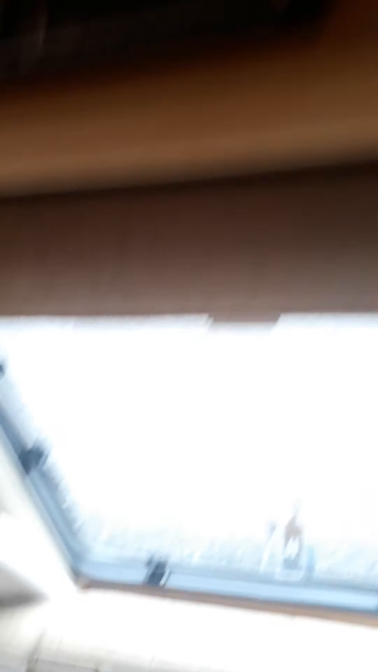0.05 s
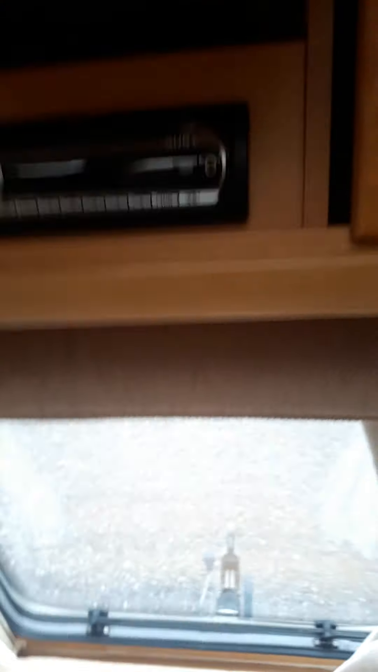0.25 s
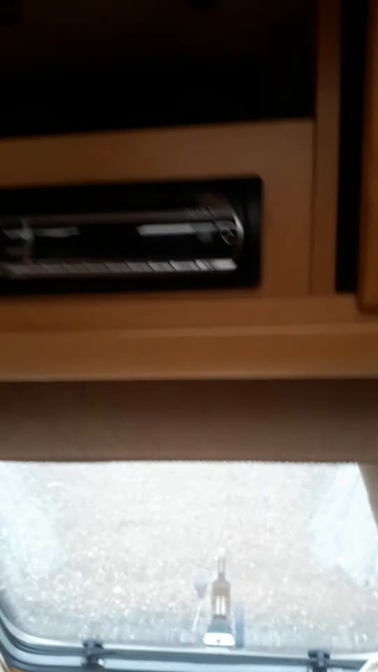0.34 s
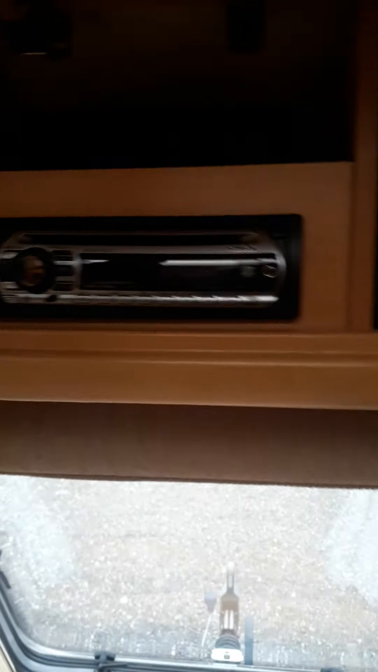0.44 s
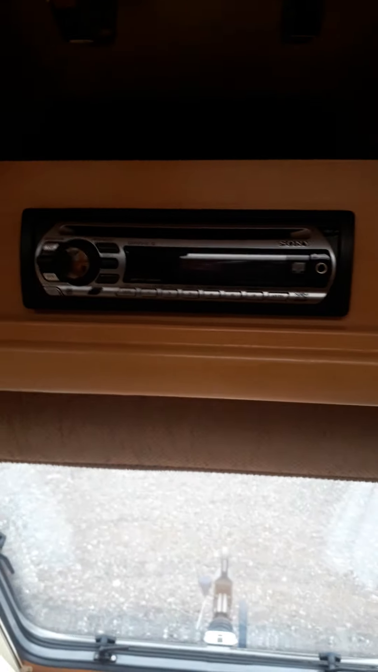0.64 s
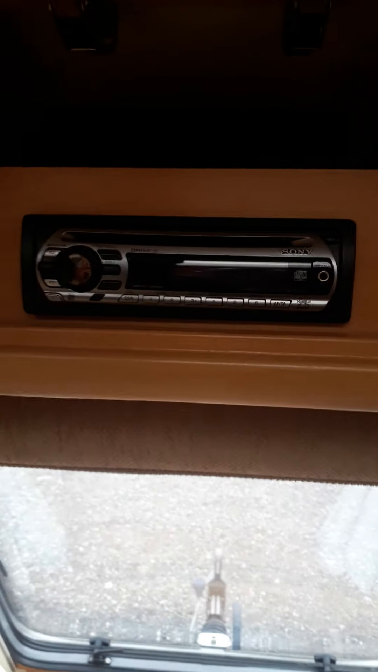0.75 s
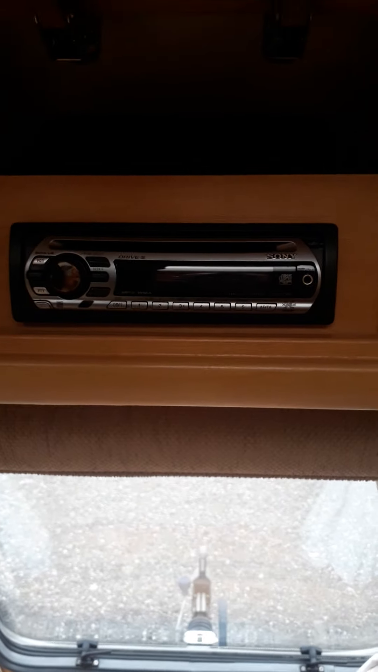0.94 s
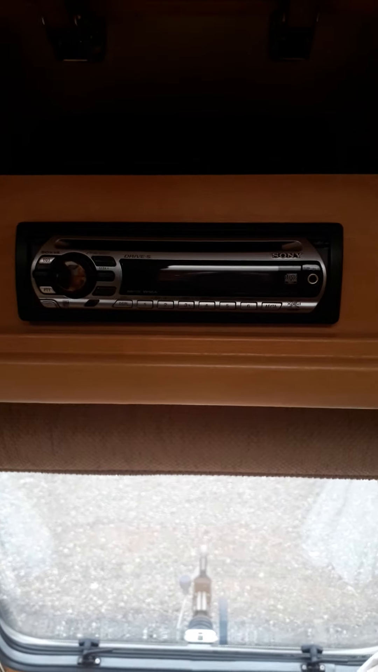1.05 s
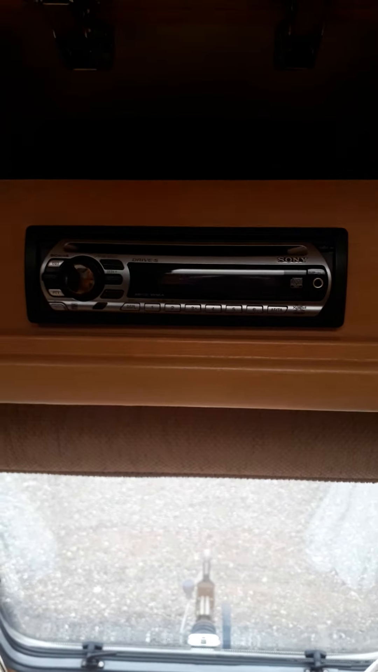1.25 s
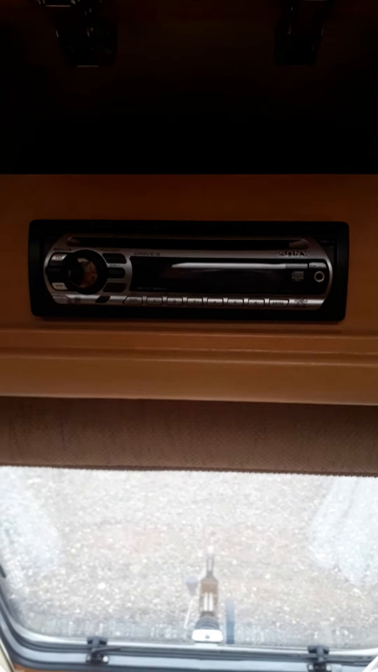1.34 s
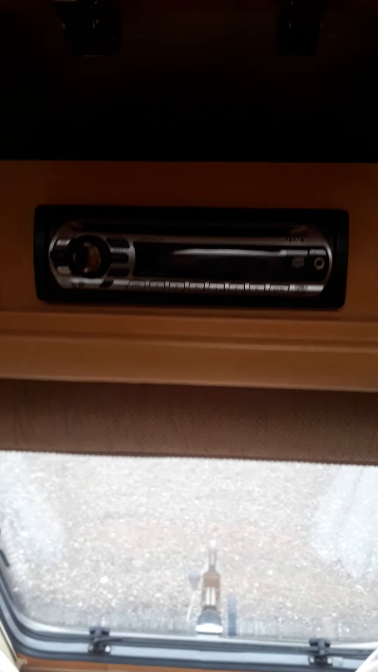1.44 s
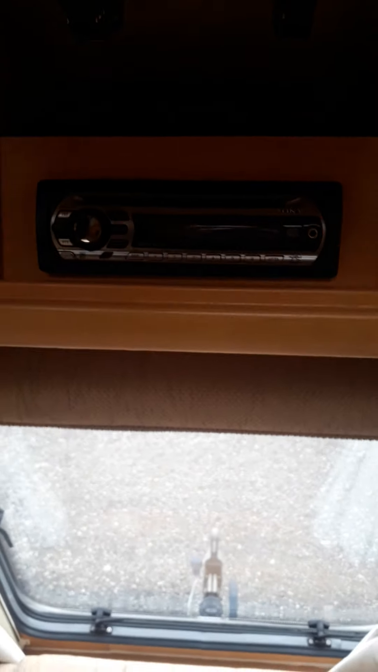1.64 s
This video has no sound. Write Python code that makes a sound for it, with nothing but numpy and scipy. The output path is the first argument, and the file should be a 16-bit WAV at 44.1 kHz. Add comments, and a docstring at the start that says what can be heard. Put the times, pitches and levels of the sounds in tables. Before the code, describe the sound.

A small wooden overhead locker door is pushed shut with a thump and sharp catch snap.

```python
"""First a low hum with faint bumps and ticks, then a caravan's overhead locker is pushed shut close by.
The catch scrapes over its striker, the wooden door thumps on the cabinet and the catch snaps home.
Fittings rattle, the small cabin rings briefly, then faint bumps, ticks and rustles follow.
Hard parts ring as fading sine waves or short noise bursts; rustles, air and hiss are filtered noise."""
import sys
import numpy as np
from scipy import signal
from scipy.fft import rfft, irfft
from scipy.io import wavfile
from scipy.ndimage import uniform_filter1d

SR = 44100
rng = np.random.default_rng(int(sys.argv[2]) if len(sys.argv) > 2 else 0)


def to_wav(s):
    """Save 16-bit WAV."""
    ch = np.atleast_2d(s).T  # columns
    pcm = np.round(np.clip(ch, -1, 1) * 32767)  # PCM
    wavfile.write(sys.argv[1], SR, pcm.astype(np.int16))


N = 74970
t = np.arange(N) / SR
RING = t[:16384]  # time axis of one short sound, about 0.37 s
# In all tables and settings, t60 is the time in seconds for a sound to fall by 60 dB.

# Ways the door and cabinet vibrate. Each row: pitch in Hz, level in dB, t60 in s, lean to the left in dB.
DOOR_MODES = [(92.6, -18.5, 0.43, 6), (122.7, -1, 0.14, 4.5), (170, -1.8, .13, 4), (207.7, -5.5, 0.16, 2.5),
              (340.4, -15, 0.21, 6.5), (385.4, -4, 0.073, 3.5), (568.4, 0, 0.049, 6.5), (668, -7, 0.097, 5),
              (756, -11, 0.11, 7), (905.4, -13.5, 0.12, -3), (1197, -15, 0.099, 2), (1320, -14.5, .11, 0.5)]
# Tone of the dense ring of the wooden panels. Each row: frequency in Hz, gain in dB.
PANEL_COLOUR = [(60, -26), (120, -6.5), (250, -2), (600, -4.5), (1000, -9), (1350, -1.5), (2500, -7),
                (6000, -9), (16000, -43)]
# The door meets the frame and chatters. Each row: start in s, level in dB, contact time in ms.
BLOWS = [(0.209, -38.5, 0.74), (0.2195, -23.5, 0.79), (0.2249, -16.5, 2.98), (0.2462, -26, 3.2),
         (0.2805, -26.5, 4.7), (.2940, -37, 0.45), (0.3427, -34.5, 3.3), (.3515, -45, .6),
         (0.3849, -29.5, 18)]


def door():
    """Each blow sets the door and cabinet vibrating; a longer contact is duller."""
    panels_db, panels_t60_s = -4.5, 0.063
    rise_s, cut_hz = 0.00034, 98
    body = amp(panels_db) * burst(PANEL_COLOUR, panels_t60_s)
    for hz, db, t60, pan_db in DOOR_MODES:
        body += amp(db) * pan(pan_db) * np.cos(2 * np.pi * hz * RING) * fade(t60)
    # the blow takes a moment to spread over the door
    body = body * (1 - np.exp(-RING / rise_s))
    # a small door radiates little bass
    body = shape(body, lambda f: 1 / np.hypot(1, (cut_hz / f) ** 2))
    out = np.zeros((2, N))
    for s, db, contact_ms in BLOWS:
        corner_hz = 1000 / contact_ms
        add(out, s, amp(db) * shape(body, lambda f: 1 / (1 + (f / corner_hz) ** 2)))
    return out


# The catch snaps home and bounces. Each row: start in s, level in dB against the settings below.
SNAPS = [(.2928, -1.5), (0.2950, -13.5), (0.2995, -12.5), (0.3022, -16.5)]
# Tone of the sharp crack of each contact. Each row: frequency in Hz, gain in dB.
CRACK_COLOUR = [(200, -15), (1500, -5.5), (2200, -3.5), (2750, 4), (3600, -1), (4600, -0.5), (6300, 7),
                (8000, 0.5), (12000, -1), (16000, -9)]
# Tone of the plastic housing. Each row: frequency in Hz, gain in dB.
HOUSING_COLOUR = [(150, 1.5), (560, 6), (900, -7), (1650, -2), (2650, 0), (3500, 0), (4300, -9),
                  (6000, -17.5), (8000, -10.5), (11000, -14), (16000, -31)]


def snaps():
    """Each contact of the catch gives a very short crack and a longer ring of its plastic housing."""
    crack_db, crack_t60_s = -18, 0.0055
    housing_db, housing_t60_s = -28, 0.034
    out = np.zeros((2, N))
    for s, db in SNAPS:
        crack = amp(db + crack_db) * burst(CRACK_COLOUR, crack_t60_s)
        housing = amp(db + housing_db) * burst(HOUSING_COLOUR, housing_t60_s)
        add(out, s, crack + housing)
    return out


# Ways the catch and its mounting vibrate.
# Each row: pitch in Hz, level in dB, t60 in s, lean to the left in dB.
CATCH_MODES = [(563, -34, 0.066, 6), (1265, -42, 0.059, 9), (1660, -37, 0.056, 3.5), (2020, -42, 0.083, -2),
               (2435, -36.5, 0.037, 1), (2744, -29, 0.021, 0), (3194, -38, 0.046, 4),
               (3568, -37.5, 0.034, -7)]


def catch_ring():
    """The first snap makes the catch and its mounting ring at their own pitches."""
    out = np.zeros((2, N))
    first_snap_s = SNAPS[0][0]
    for k, (hz, db, t60, pan_db) in enumerate(CATCH_MODES):
        sign = (-1) ** k  # every other mode starts the opposite way
        add(out, first_snap_s, sign * amp(db) * pan(pan_db) * mode(hz, t60))
    return out


# Small jumps of the catch over its striker.
# Each row: start in s, level in dB, treble tilt in dB per octave above 500 Hz, t60 in s.
SCRAPES = [(.2043, -37.5, 3.5, 0.019), (.2099, -28.5, 3.5, 0.015), (.2124, -30.5, 1.5, 0.01),
           (.2175, -29.5, -4, 0.022), (.2210, -27, 0.5, 0.016), (.2275, -28.5, -6, 0.027),
           (0.2360, -38, 0, 0.016), (.2420, -37.5, 0.7, .028), (0.2686, -44.5, 1.3, 0.033)]
# Tone of the scraping catch, for jumps and crunch. Each row: frequency in Hz, gain in dB.
SCRAPE_COLOUR = [(100, -25.5), (400, 12), (900, 3.5), (1400, 2.5), (1750, 0.5), (2100, 8.5), (2700, -2),
                 (4400, -6), (5500, -4.5), (7300, -3), (10000, -9.5), (16000, -17)]


def scrapes():
    """The catch rides over its striker in small jumps, each a short burst of noise."""
    out = np.zeros((2, N))
    for s, db, tilt_db, t60 in SCRAPES:
        add(out, s, amp(db) * burst(SCRAPE_COLOUR, t60, tilt_db))
    return out


def crunch():
    """Gritty friction of the catch between the jumps: rough noise that swells and dies away."""
    peak_s, rise_s, fall_s = 0.2188, 0.0067, 0.017
    level_db, roughness = -37, 0.45
    pressure = np.exp(np.minimum((t - peak_s) / rise_s, (peak_s - t) / fall_s))
    # smoothed noise makes the loudness flicker
    grit = uniform_filter1d(rng.standard_normal(N), size=40)
    grit = np.exp(roughness * grit / grit.std() - roughness ** 2)
    return amp(level_db) * tint(noise(N) * grit * pressure, SCRAPE_COLOUR)


# Short pinging knocks: the catch first touching its striker, loose fittings, and late clicks at the catches.
# Each row: start in s, level in dB against the settings below, lean to the left in dB, ring pitch in Hz.
KNOCKS = [(0.0143, -57, -6.5, 2350), (.2020, -38.5, 7, 2120), (0.2076, -34.5, 8, 2070),
          (0.315, -38, -7, 2220), (0.3499, -39, 5.5, 2100), (0.3533, -44, -5, 1770), (0.357, -46, -2, 2370),
          (0.3992, -45, -4.5, 2230), (0.4988, -61.5, 0, 2550), (1.4002, -65, 6, 2700),
          (1.4470, -61, -4, 2550), (1.4546, -62, 7, 2170)]
# Tone of the noisy part of a knock. Each row: frequency in Hz, gain in dB.
KNOCK_COLOUR = [(200, 5), (600, -1), (1000, -7), (1500, -2.5), (2350, -3.5), (3200, -13), (5000, -17),
                (16000, -44)]


def knocks():
    """Each small knock of catch or fittings is a noisy clack with a short ring at one pitch."""
    clack_db, clack_t60_s = -5.5, 0.024
    ring_db, ring_t60_s = -2.5, 0.012
    out = np.zeros((2, N))
    for s, db, pan_db, hz in KNOCKS:
        clack = amp(clack_db) * burst(KNOCK_COLOUR, clack_t60_s)
        ring = amp(ring_db) * mode(hz, ring_t60_s)
        add(out, s, amp(db) * pan(pan_db) * (clack + ring))
    return out


# Light ticks of fingers on the catches.
# Each row: start in s, level in dB, treble tilt in dB per octave above 500 Hz, t60 in s.
TICKS = [(0.0962, -52, 2.5, 0.026), (0.4996, -56, 5, 0.011), (.5580, -51.5, 7.5, 0.01),
         (1.4461, -55.5, 0, 0.016), (1.4510, -65, -0.5, 0.067)]
# Tone of a tick. Each row: frequency in Hz, gain in dB.
TICK_COLOUR = [(300, -13), (1400, -14), (2300, 3), (3400, -5.5), (4600, 4), (5800, -4.5), (7400, -0.5),
               (10000, -7), (16000, -7)]


def ticks():
    """Fingers tap the catches lightly: each tick is a short burst of noise."""
    out = np.zeros((2, N))
    for s, db, tilt_db, t60 in TICKS:
        add(out, s, amp(db) * burst(TICK_COLOUR, t60, tilt_db))
    return out


# Answer of the cabin to each pitch. Each row: frequency in Hz, gain in dB.
CABIN_COLOUR = [(50, -25), (130, -4), (400, -6.5), (1000, -5.5), (2500, -6), (6000, -11), (16000, -9.5)]


def cabin(x):
    """Near cupboard fronts answer at once; the furnished cabin adds a short tail."""
    tail_db, low_t60_s, high_t60_s, tail_rise_s = -6, 0.39, 0.37, 0.0019
    early_db, early_t60_s, early_rise_s = -7.5, 0.063, 0.0013
    # bass and treble of the tail meet at 2000 Hz and fade separately
    low = shape(noise(len(RING)) * fade(low_t60_s), lambda f: 1 / np.hypot(1, f / 2000))
    high = shape(noise(len(RING)) * fade(high_t60_s), lambda f: 1 / np.hypot(1, 2000 / f))
    tail = (low + high) * (1 - np.exp(-RING / tail_rise_s))
    tail = shape(unit(tail), lambda f: colour(CABIN_COLOUR, f))
    early = noise(len(RING)) * fade(early_t60_s) * (1 - np.exp(-RING / early_rise_s))
    # the near fronts send back little below 500 Hz
    early = shape(unit(even(early)), lambda f: 1 / np.hypot(1, (500 / f) ** 2))
    echoes = amp(tail_db) * tail + amp(early_db) * early
    return signal.fftconvolve(x, echoes, axes=1)[:, :N]


# Soft bumps on the furniture. Each row: start in s, level in dB, pitch in Hz, t60 in s.
BUMPS = [(0.044, -52.5, 103, 0.13), (0.104, -53, 197, 0.12), (.3280, -40, 272.3, 0.16),
         (.3740, -34, 116, 0.054), (0.451, -38.5, 154, 0.041), (0.589, -44.5, 129, 0.075),
         (0.583, -54.5, 233, 0.07), (1.361, -41.5, 100, 0.1), (1.416, -43, 90, 0.071),
         (1.5043, -37.5, 199, 0.028), (1.5320, -53, 288.4, 0.2)]


def bumps():
    """Each soft bump on the furniture is one low vibration with a gentle start."""
    out = np.zeros((2, N))
    for s, db, hz, t60 in BUMPS:
        soft_start = 1 - np.exp(-2 * hz * RING)
        add(out, s, amp(db) * mode(hz, t60) * soft_start)
    return out


# Rustles of someone moving. Each row: loudest moment in s, time from there to fall to about an
# eighth in s, level at the loudest moment in dB, centre in Hz, width in octaves.
RUSTLES = [(0.058, 0.16, -70.5, 4400, 1), (0.576, 0.075, -63, 694, 0.45), (0.817, 0.058, -73.5, 610, 0.65),
           (1.096, 0.028, -69.5, 960, 0.37), (1.536, 0.18, -74, 990, 0.51), (1.483, 0.3, -66.5, 254, 0.31)]


def rustles():
    """Someone moving about: bands of noise that swell and fade smoothly."""
    out = np.zeros((2, N))
    for s, length, db, hz, octaves in RUSTLES:
        rub = shape(noise(N), lambda f: bell(f, hz, octaves))
        swell = np.exp(-2 * ((t - s) / length) ** 2)
        out += amp(db) * rub / rub.std() * swell
    return out


# Steady tones of the hum. Each row: pitch in Hz, level in dB.
HUM = [(37.7, -73.5), (75.4, -73.5), (113, -72), (150.7, -73.5)]


def hum():
    """A low hum: steady sine waves, each starting at a random point of its cycle."""
    return sum(amp(db) * np.sqrt(2) * np.sin(2 * np.pi * (hz * t + rng.random())) for hz, db in HUM)


# Tone of the steady air noise. Each row: frequency in Hz, gain in dB.
AIR_COLOUR = [(25, -14.5), (60, -2), (120, 2.5), (200, -9), (270, -4), (380, -13.5), (550, -17), (780, -10),
              (1050, -19), (1350, -18), (1700, -25.5), (3000, -27.5), (7000, -33), (16000, -30)]
# How far the air noise leans to one side. Each row: frequency in Hz, lean to the left in dB.
AIR_PAN = [(250, 3), (450, 9), (750, 2), (1000, 3.5), (1400, -1.5), (6000, -.5), (9500, 1)]


def air():
    """Steady air noise on both sides, with a narrow hiss on the right."""
    air_db, hiss_hz, hiss_db = -64.5, 3970, -79.5
    left, right = amp(air_db) * tint(noise(N), AIR_COLOUR)
    # half of the lean goes to each side
    left = shape(left, lambda f: colour(AIR_PAN, f) ** .5)
    right = shape(right, lambda f: colour(AIR_PAN, f) ** -.5)
    hiss = shape(rng.standard_normal(N), lambda f: bell(f, hiss_hz, 0.13))
    return np.array([left, right + amp(hiss_db) * hiss / hiss.std()])


def amp(db):
    """Turns decibels into a gain."""
    return 10 ** (np.asarray(db) / 20)


def bins(size):
    """Frequencies of a spectrum in Hz, kept at 1 or more."""
    return np.maximum(np.fft.rfftfreq(size, 1 / SR), 1)


def colour(points, f):
    """Gain at f, read from a curve of (Hz, dB) points."""
    hz, db = np.array(points).T
    return amp(np.interp(np.log(f), np.log(hz), db))


def bell(f, hz, octaves):
    """Gain of a smooth hump around one frequency."""
    return np.exp(-.5 * (np.log2(f / hz) / octaves) ** 2)


def noise(size):
    """White stereo noise, alike on both sides in the bass and unrelated in the treble."""
    diffuse_hz = 980  # the sides drift apart around here
    mid, side = np.exp(2j * np.pi * rng.random((2, size // 2 + 1)))
    apart = bins(size) / np.hypot(bins(size), diffuse_hz)
    spectrum = mid + np.array([[1], [-1]]) * apart * side
    x = irfft(spectrum / np.sqrt(1 + apart ** 2), size)
    return x / x.std()


def shape(x, gain):
    """Filters x by a gain for each frequency, with nothing sounding ahead of its cause."""
    size = 2 * x.shape[-1]
    # folding the cepstrum (the spectrum of the log gain) forward gives a minimum-phase filter
    cepstrum = irfft(np.log(gain(bins(size)) + 1e-5))
    cepstrum[1:size // 2] *= 2
    cepstrum[size // 2 + 1:] = 0
    return irfft(rfft(x, size) * np.exp(rfft(cepstrum)))[..., :size // 2]


def tint(x, points, tilt_db=0):
    """Colours white sound and keeps its power."""
    def gain(f):
        return colour(points, f) * amp(tilt_db * np.log2(np.maximum(f, 500) / 500))
    return shape(x, gain) / np.sqrt(np.mean(gain(bins(len(RING))) ** 2))


def fade(t60):
    """Exponential decay by 60 dB in t60 seconds."""
    return np.exp(-np.log(1000) * RING / t60)


def mode(hz, t60):
    """One decaying vibration."""
    return np.sin(2 * np.pi * hz * RING) * fade(t60)


def even(x):
    """Levels out chance peaks and dips in the spectrum of each side, keeping its power."""
    power = np.abs(rfft(x, 2 * x.shape[-1])) ** 2
    smooth = uniform_filter1d(power, size=120, axis=1)
    return np.array([shape(side, lambda f: np.sqrt(p.mean() / p)) for side, p in zip(x, smooth)])


def burst(points, t60, tilt_db=0):
    """Fading noise, like many close vibrations that start together and die away."""
    return tint(even(noise(len(RING)) * fade(t60)), points, tilt_db)


def unit(h):
    """Scales a stereo echo pattern to an energy of one per side on average."""
    return h / np.sqrt(np.sum(h ** 2) / 2)


def pan(db):
    """Left and right gains for a lean to the left in dB."""
    return amp(np.array([[db], [-db]]) / 2)


def add(out, s, x):
    """Mixes x into out, starting at s seconds."""
    i = max(int(s * SR), 0)
    out[:, i:i + x.shape[-1]] += x[..., :N - i]


# Tone of the right microphone against the left. Each row: frequency in Hz, gain in dB.
RIGHT_MIC = [(100, 1), (700, 2), (1500, 2), (2400, 0.5), (3700, 6), (6000, -1.5), (7200, -5.5), (8400, -18),
             (10300, -17), (12000, -8.5), (16000, -26)]


def scene():
    """The locker in its cabin, heard by two unlike microphones, plus movement and background."""
    near = door() + crunch() + scrapes() + snaps() + knocks() + ticks()
    left, right = near + catch_ring() + cabin(near)
    right = shape(right, lambda f: colour(RIGHT_MIC, f))
    return np.array([left, right]) + bumps() + rustles() + hum() + air()


def record(dry):
    """The recorder cuts the treble steeply above 16000 Hz."""
    top_cut = signal.ellip(10, .2, 80, 16000, fs=SR, output="sos")
    return signal.sosfilt(top_cut, dry)


dry = scene()
out = record(dry)
to_wav(out)
```